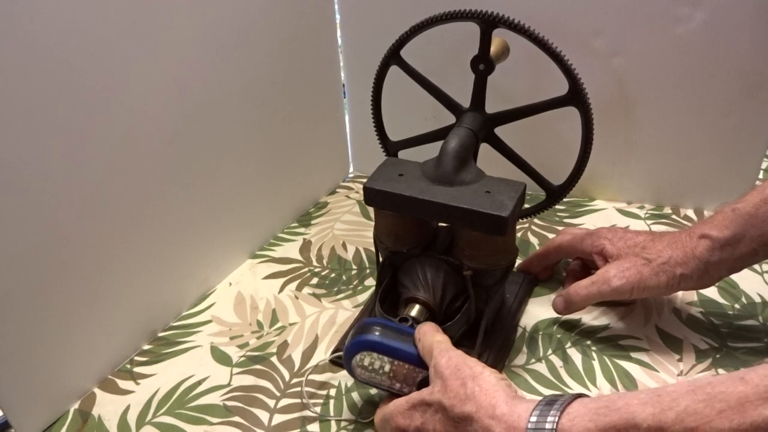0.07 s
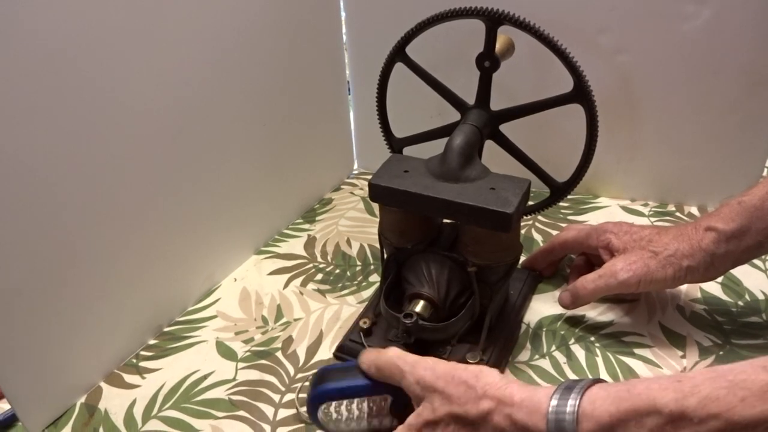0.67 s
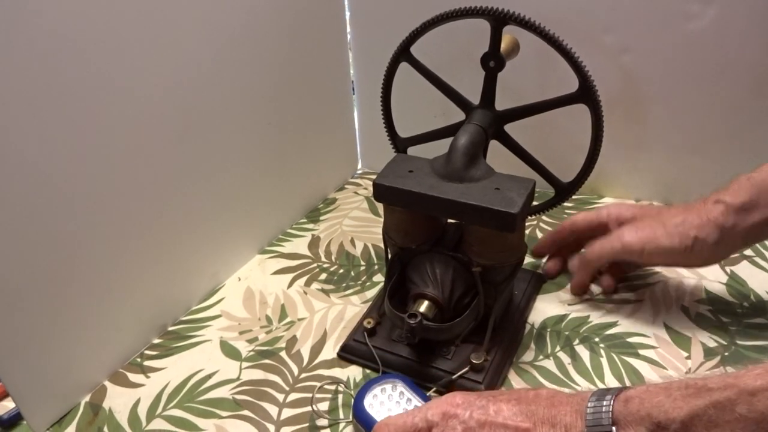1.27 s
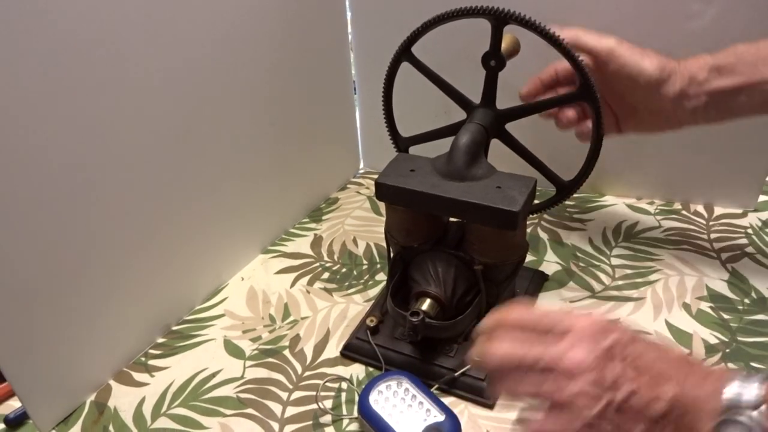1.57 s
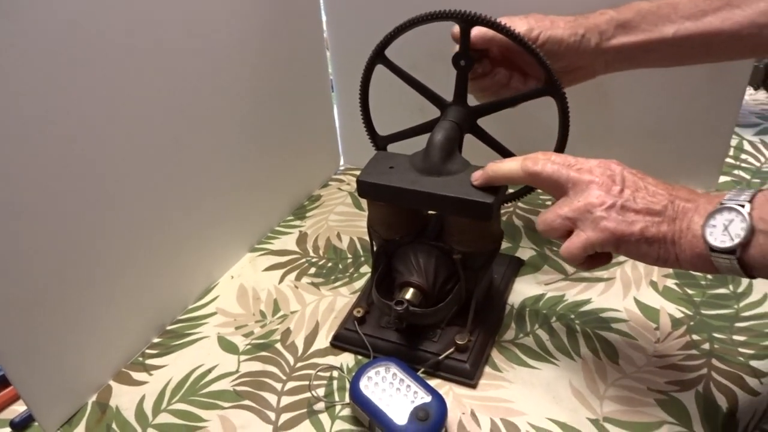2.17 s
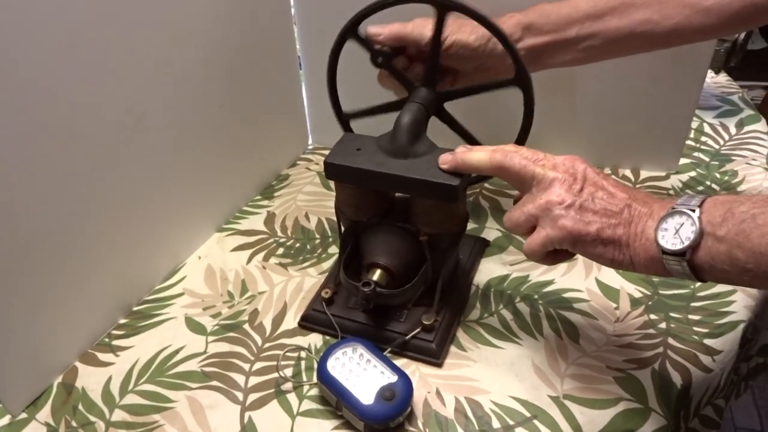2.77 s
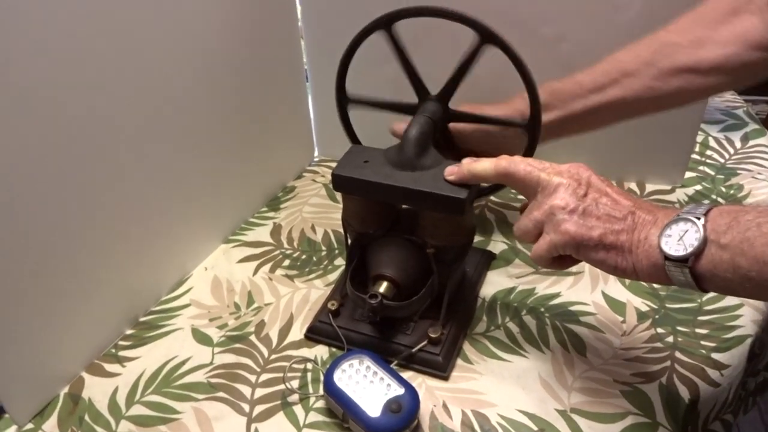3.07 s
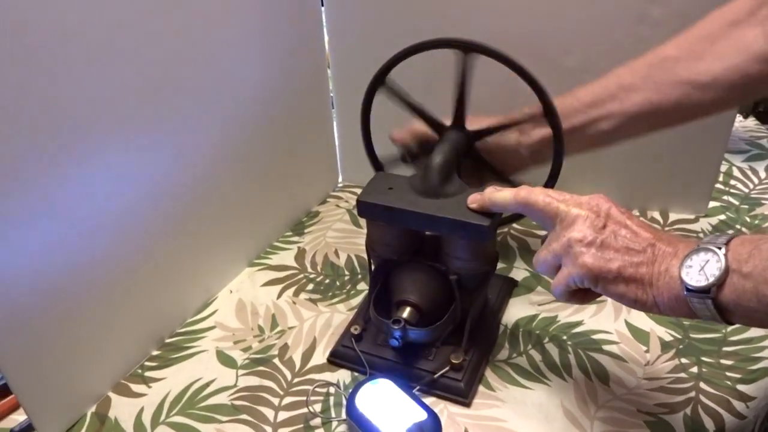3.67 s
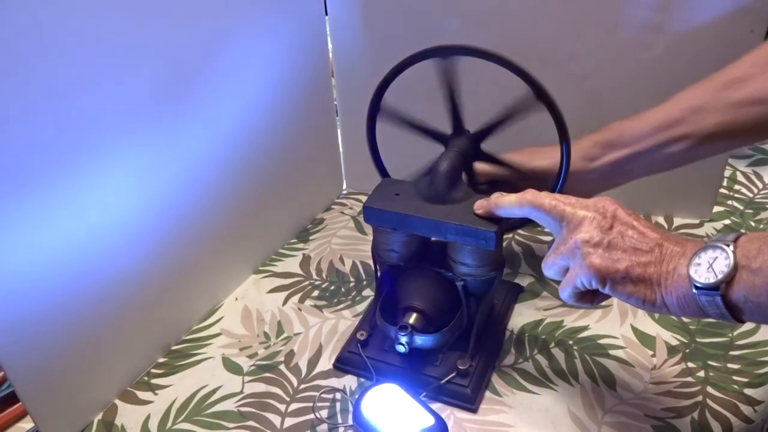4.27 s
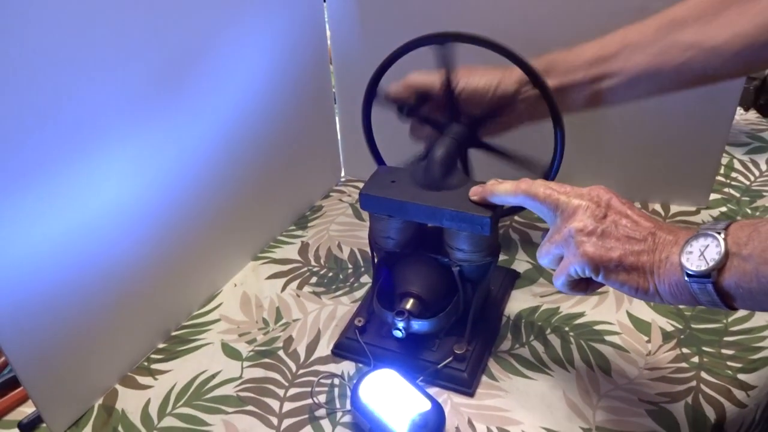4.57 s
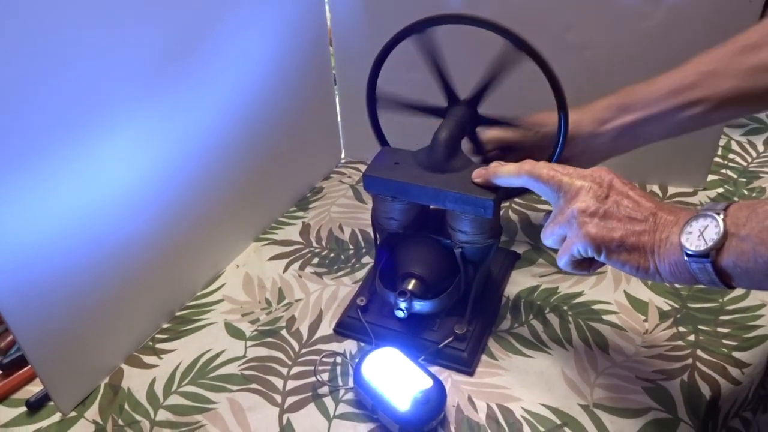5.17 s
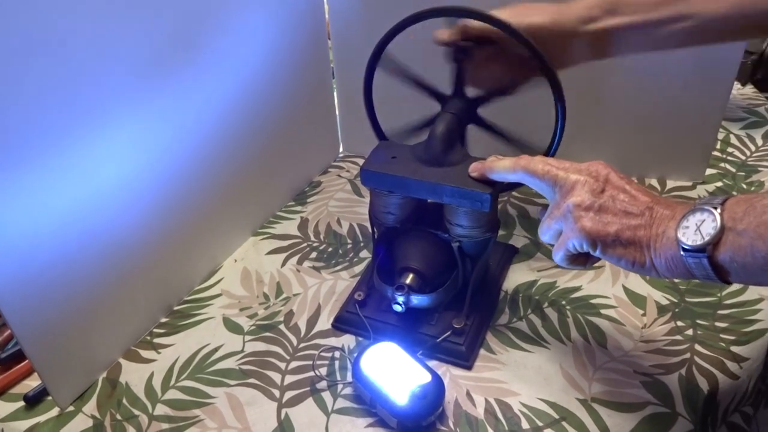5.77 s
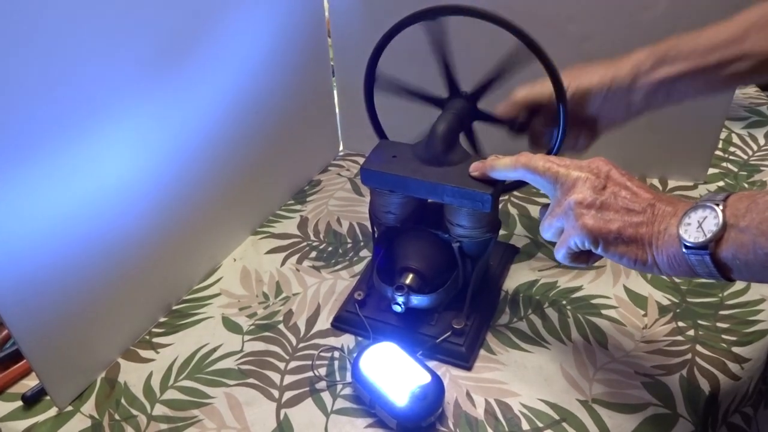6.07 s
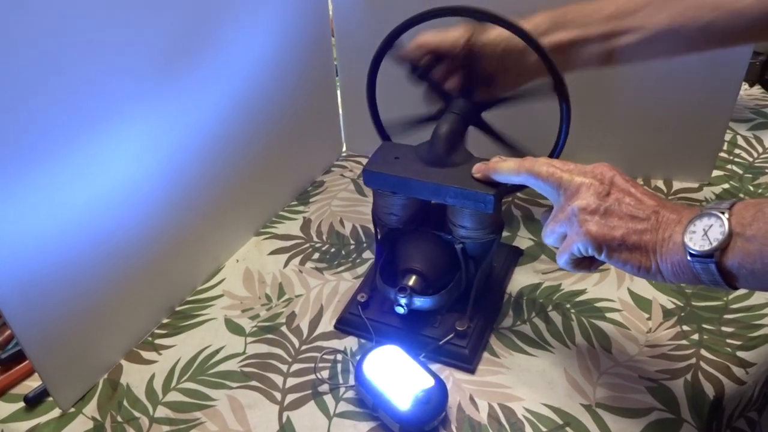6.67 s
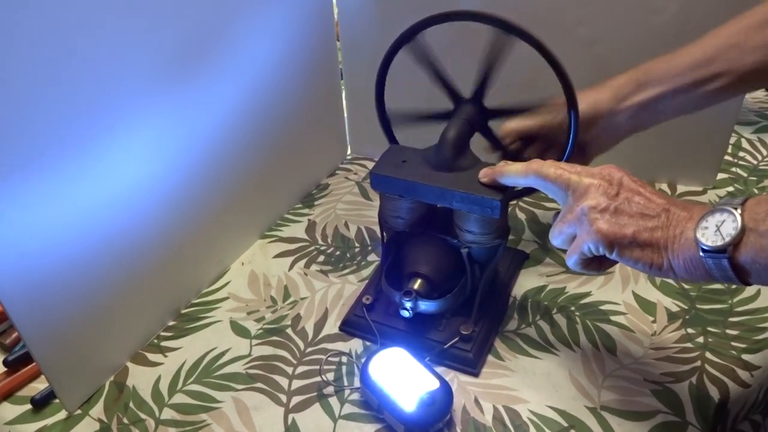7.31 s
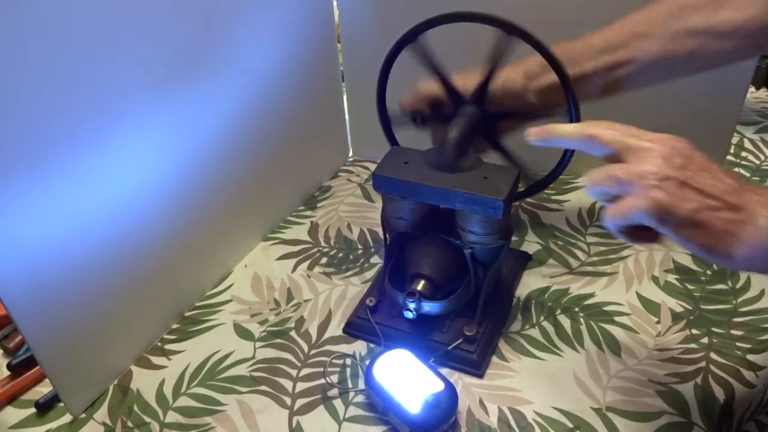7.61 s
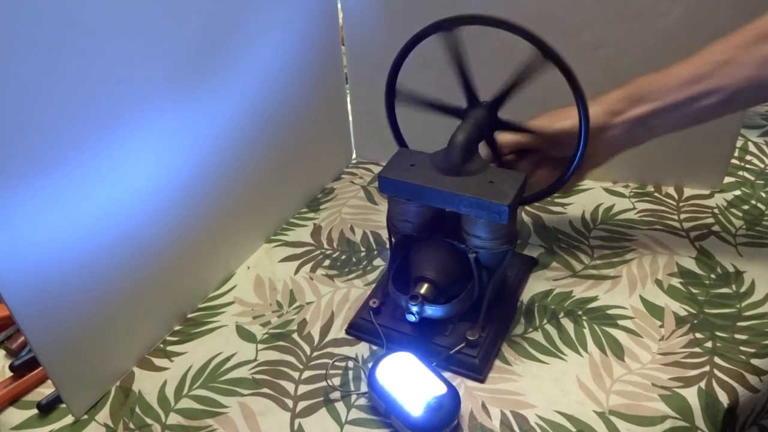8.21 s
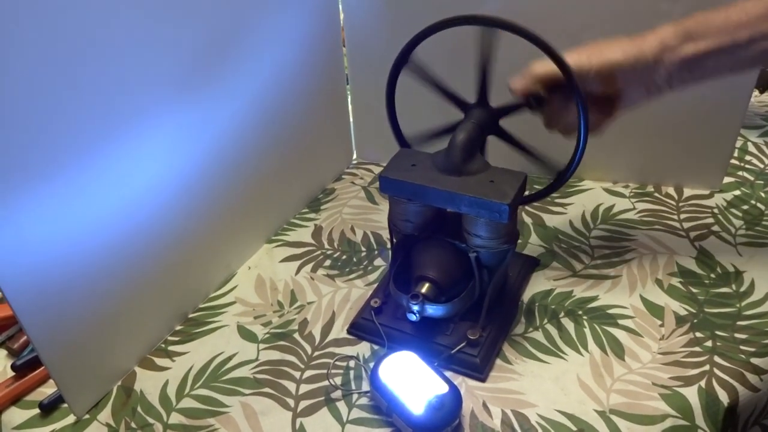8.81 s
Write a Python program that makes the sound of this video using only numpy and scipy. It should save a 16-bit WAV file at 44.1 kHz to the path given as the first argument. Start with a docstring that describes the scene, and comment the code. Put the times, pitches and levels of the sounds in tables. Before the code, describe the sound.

A lamp slides softly over a tablecloth and a hand lightly taps an iron frame. Then an old cast-iron hand generator is cranked: its gear teeth thud and clash, quickly rising in pitch to a loud, grinding whir with a bright metallic rattle. A low drone swells with each turn of the crank, about twice a second. It is heard close up in a small room with a faint fan hiss.

```python
"""Soft slides and light taps come first: a lamp is moved over a tablecloth, a hand taps an iron frame.
Then an old cast-iron hand generator is cranked up to speed, close by in a small room. The teeth of
its big wheel thud and grind, swelling with each push of the crank, and the base drones at the tooth
rate. The loose pinion clashes, rattles and sets the iron ringing. A distant fan hisses faintly."""
import sys
import numpy as np
from scipy import signal
from scipy.fft import rfft, irfft, next_fast_len
from scipy.io import wavfile
from scipy.ndimage import uniform_filter1d

SR = 44100
rng = np.random.default_rng(int(sys.argv[2]) if len(sys.argv) > 2 else 0)


def unload_wav(signal):
    """Save mono or channel-first audio to the path in sys.argv[1] as 16-bit WAV at rate SR, clipped to [-1, 1]."""
    wavfile.write(
        sys.argv[1],
        SR,
        np.round(np.clip(np.atleast_2d(signal).T, -1, 1) * 32767).astype(np.int16),
    )


N = 399105
T = np.arange(N) / SR


# wheel run-up and cruise, before surge: (time [s], tooth rate [Hz])
WHEEL_SPEED = [(2.3, 31.2), (2.6, 71.7), (3.1, 155), (3.3, 194), (3.6, 253), (4.2, 304), (5.1, 329),
               (6.4, 328), (7.2, 330), (8.1, 314), (9.05, 297)]
def tooth_rate(surge=.04):
    """Teeth meshing per second; the wheel surges with each push."""
    turning = T > WHEEL_SPEED[0][0]
    return curve(WHEEL_SPEED) * (1 + surge * stroke()) * turning


# one push per crank turn: (time [s], grind [dB], drone [dB], thud [dB], stroke depth [1 = usual])
CRANK_PUSHES = [(2.3, -3.5, -7, 0, 0.49), (3.05, -2.8, 2, -.5, .5), (3.72, 1.4, 1.5, .3, 1.1),
                (4.22, .6, 1.5, 0.5, .6), (4.68, -.3, -1.5, 0, .7), (5.09, -.3, 2, .5, 0.91),
                (5.53, .5, 1, -.5, 1.1), (5.96, -.4, 0, -.3, .8), (6.35, -.7, .5, -.3, .9),
                (6.81, -.5, -1, 1.5, 1), (7.23, -.3, -3, .5, 1.1), (7.67, -.6, -3.8, -1, 1.2),
                (8.12, -1.3, -2.8, 0, 1.3), (8.59, 0, -2.5, -0.5, 1.31), (9.07, -.3, -6, -0.5, 1)]
def stroke(lag_turns=0, per_turn=1):
    """Arm swing, peaking lag_turns after each push; per_turn=2 is push and pull."""
    push_s = [row[0] for row in CRANK_PUSHES]
    turns = np.interp(T, push_s, np.arange(len(push_s)))
    return curve(CRANK_PUSHES, column=4) * np.cos(2 * np.pi * per_turn * (turns - lag_turns))


# force on the crank: (time [s], level [dB])
CRANK_EFFORT = [(2.45, -37), (2.6, -16), (2.7, -9.5), (2.77, -12.5), (2.87, -4), (2.95, 0), (3.14, 0),
                (3.5, -7), (4.2, -7.5), (4.8, -9), (6.7, -10), (7.6, -12), (9.05, -11.5)]
def effort_db():
    """Crank load, greatest during run-up."""
    return curve(CRANK_EFFORT)


def mesh(rate_hz):
    """Running tooth count, and the samples at which a tooth engages."""
    teeth = np.cumsum(rate_hz * (1 + .025 * wander(45))) / SR
    return teeth, np.flatnonzero(np.diff(np.floor(teeth)))


def swell(level_db, swing_db, lag_turns, jitter_db):
    """Gain that rises and falls once a crank turn, never twice alike."""
    return gain_of(level_db + swing_db * stroke(lag_turns) + jitter_db * wander(26))


def comes_in(rate_hz, onset_hz):
    """Gain that climbs steeply with tooth rate and levels off above the onset."""
    drive = (rate_hz / onset_hz) ** 8
    return np.sqrt(drive / (1 + drive))


# frame and table-top modes: (frequency [Hz], level [dB], t60 [s])
FRAME_MODES = [(167.7, -2, 0.34), (199, -6, 0.13), (257.2, -3, 0.26), (284, -9.5, 0.059), (397, -10, 0.042),
               (489, -12, 0.13)]
TABLE_MODES = [(62, -21, 0.13), (88.4, -10.5, 0.26), (107, 0, 0.3), (132, -1, 0.28)]
def thudding(teeth, at, rate_hz):
    """Uneven teeth shake frame and table; a tone at the tooth rate rises through the thuds."""
    frame = steadied(struck(FRAME_MODES, at, split=.078, drift_db=3.5), .077)
    tone = np.sin(2 * np.pi * teeth) * gain_of(2 * wander(30))
    tone = coloured(tone, [(110, -22), (160, .5), (200, 3), (260, 4.5), (310, -33)])
    frame = coloured(gain_of(-.5) * frame + gain_of(-1.5) * tone, [(70, -2), (150, .97)])
    table = steadied(struck(TABLE_MODES, at, split=.079, drift_db=2.5), .093)
    table = coloured(table, [(20, 19), (40, -7), (80, .5)])
    load_db = effort_db() + curve(CRANK_PUSHES, column=3)
    pull_db = stroke(lag_turns=.54, per_turn=2)
    thud = swell(-18.9, swing_db=1.9, lag_turns=.02, jitter_db=1.6) * gain_of(load_db + pull_db)
    rumble = swell(-31.8, swing_db=2.5, lag_turns=.72, jitter_db=2) * gain_of(.5 * load_db)
    return thud * frame + rumble * comes_in(rate_hz, onset_hz=100) * table


def tooth_pressure(rate_hz):
    """How hard the teeth rub, as a gain; follows effort, speed and each push."""
    load = gain_of(.41 * effort_db() + curve(CRANK_PUSHES, column=1))
    push = swell(-21.4, swing_db=2.7, lag_turns=0, jitter_db=.5)
    return push * load * comes_in(rate_hz, onset_hz=127)


# sliding-tooth spectrum: (frequency [Hz], density [dB])
GRIND_SPECTRUM = [(50, -34), (200, -13), (450, 5), (780, 0.5), (900, -0.5), (1450, -1.5), (1750, -1.5),
                  (2300, -1), (3150, 0.5), (3500, -3.5), (5900, 1), (7100, -2.5), (10700, -5),
                  (11500, -8.5), (15200, -20)]
# spoke and bracket modes: (frequency [Hz], level [dB], t60 [s])
SPOKE_MODES = [(636, 2.5, 0.053), (774, -.5, 0.065), (839, -1.5, 0.068), (1097, 1, 0.029),
               (1649, -.5, .055), (1930, 2, 0.033), (2217, 2, .07), (2470, -3.5, 0.094),
               (3143, -1.5, 0.036), (3995, 0.5, .07), (4520, -1, .08)]
def grinding(teeth, at, rate_hz, pressure):
    """Each tooth scrapes and rings the spokes; hiss takes over from ringing with speed."""
    scrape = (1.8 + np.exp(-(teeth % 1) / .34)) * gain_of(2.8 * wander(350))
    noise = unit_rms(coloured(scrape * rng.standard_normal(N), GRIND_SPECTRUM))
    spokes = steadied(struck(SPOKE_MODES, at, split=.015, drift_db=6.5), .08)
    hiss_share = .4 + .37 * np.clip(rate_hz / 300, 0, 1)
    hiss = gain_of(4.5) * np.sqrt(hiss_share) * dulled_when_slow(noise)
    ringing = gain_of(1.5) * np.sqrt(1 - hiss_share) * spokes
    return pressure * gain_of(.35 * lull_db()) * dulled_when_slow(hiss + ringing)


# pinion-and-tooth modes, wheel-rim modes: (frequency [Hz], level [dB], t60 [s])
IRON_MODES = [(3676, -13, 0.031), (3950, -9.5, 0.085), (4530, -6.5, 0.07), (4795, -10.5, .08),
              (4970, -12, 0.06), (5780, -2, 0.065), (6450, -8, 0.035), (6570, -5, .045), (6880, -5, 0.069),
              (6960, -8, 0.037), (7470, -4, 0.078), (8380, -10, 0.046), (8400, -2.5, 0.03),
              (8700, -0.5, 0.071), (9280, -4, 0.07), (9860, -4.5, .07), (10380, -1.5, 0.045),
              (10700, -11.5, 0.056), (10730, -4.5, .07), (10980, -7.5, 0.052), (12440, -4.5, 0.05),
              (12670, -4, 0.045), (13050, -12, .04), (13300, -12, .05), (13800, -16, .05), (13650, -8, .04),
              (14400, -9, .03), (14800, -10, .035)]
RIM_MODES = [(5171, 0, .16), (5316, -3, .13)]
# tooth-on-tooth crack: (frequency [Hz], density [dB])
CRACK_SPECTRUM = [(500, -27), (2000, -2.5), (3500, -25), (4300, -9), (6100, -12), (6700, 3), (7700, 3),
                  (9100, -6), (10700, -7), (11500, -13), (12200, -15), (13000, -17), (15000, -1.5),
                  (15400, -17)]
def rattling(at, rate_hz, pressure):
    """The pinion bounces across its backlash about once a tooth; the rim sings along."""
    scatter = (rng.uniform(-.5, .5, len(at)) * np.gradient(at)).astype(int)
    bounces = np.clip(at + scatter, 0, N - 1)
    sizes = gain_of(2.3 * rng.standard_normal(len(at)))
    iron = steadied(struck(IRON_MODES, bounces, sizes, split=.005, drift_db=3.5), .056)
    rim = steadied(struck(RIM_MODES, bounces, sizes, split=.0024, drift_db=3), .058)
    crack = steadied(coloured(bursts(bounces, sizes, t60_s=.031), CRACK_SPECTRUM), .03)
    # pressed teeth: less ring, more crack
    crack_share = np.clip(.2 * (pressure / gain_of(-25.5)) ** .65, 0, .8)
    pinion = dulled_when_slow((1 - crack_share) * iron + gain_of(-1.5) * np.sqrt(crack_share) * crack)
    pinion *= swell(-16.9, swing_db=.6, lag_turns=.25, jitter_db=.6) * comes_in(rate_hz, onset_hz=201)
    rim *= swell(-29.4, swing_db=1.8, lag_turns=.48, jitter_db=3.2) * comes_in(rate_hz, onset_hz=205)
    rim *= gain_of(-.45 * effort_db())  # rings more freely under light load
    return gain_of(lull_db()) * (pinion + rim)


# rests in the rattle: (time [s], length [s])
RATTLE_LULLS = [(3.07, .03), (3.193, 0.025), (3.256, 0.066), (3.397, 0.017), (3.486, 0.023), (3.558, 0.032),
                (3.811, .022), (3.875, .018), (4.04, .038), (4.502, .032), (4.936, .03), (5.228, .019),
                (5.345, .018), (5.78, .03), (6.209, .014), (6.62, .034), (7.056, .02), (7.355, 0.034),
                (7.498, .045), (7.784, .044), (7.958, .031), (8.284, .013), (8.397, .027), (8.46, 0.017),
                (8.859, .014), (8.91, .02)]
def lull_db(fall_db_per_s=290):
    """Ringing dies while the teeth stay in contact, until the next bounce."""
    fade_db = np.zeros(N)
    for start_s, length_s in RATTLE_LULLS:
        since_s = T[:int(length_s * SR)]
        fade_db[int(start_s * SR):][:len(since_s)] = -fall_db_per_s * since_s
    return fade_db


def droning(teeth, at, rate_hz, base_hz=338):
    """The base booms with every tooth and sings out as the tooth rate nears its resonance."""
    boom = steadied(struck([(base_hz, 0, .12)], at, split=.049, drift_db=0), .084)
    tone = np.sin(2 * np.pi * teeth) + gain_of(-23) * np.sin(4 * np.pi * teeth)
    tone *= gain_of(1.1 * wander(60))
    nearness = np.clip((rate_hz - 270) / 50, 0, 1)
    drone = steadied(boom + gain_of(4.5) * nearness * tone, .095)
    load_db = curve(CRANK_PUSHES, column=2) + stroke(lag_turns=.54, per_turn=2)
    push = swell(-27.1, swing_db=6.8, lag_turns=.01, jitter_db=1.3) * gain_of(load_db)
    return push * comes_in(rate_hz, onset_hz=94) * drone


# single tooth clashes: (time [s], relative level [dB])
TOOTH_CLASHES = [(2.6833, -29), (2.702, -29), (2.778, -21), (2.811, -22), (2.834, -24), (2.8534, -16.5),
                 (2.9244, -12), (2.9534, -11), (2.9795, -16), (3.033, -7), (3.1022, -9), (3.128, -10),
                 (3.1742, -9), (3.2191, -7), (3.231, -9), (3.321, -8), (3.3448, -7), (3.4251, -14),
                 (3.4444, -9), (3.5074, -17), (3.5464, -10), (3.588, -18), (3.7979, -8.5), (3.8342, -14),
                 (7.544, -13), (7.8292, -9), (8.303, -11)]
def clashing():
    """Hard blows where the slack is taken up."""
    time_s, level_db = np.transpose(TOOTH_CLASHES)
    at, sizes = (time_s * SR).astype(int), gain_of(level_db)
    ringing = struck(IRON_MODES + RIM_MODES, at, sizes, split=.0049, drift_db=-1)
    crack = coloured(bursts(at, sizes, t60_s=.076), CRACK_SPECTRUM)
    return dulled_when_slow(gain_of(-27) * ringing + gain_of(-3.5) * crack)


def dulled_when_slow(x):
    """Slow teeth strike and scrape dully, fast ones brightly."""
    dull = coloured(x, [(500, .5), (800, 2), (1300, 1), (2000, 0), (3000, -3), (5000, -2.5),
                        (8000, -4), (10500, -8), (13000, -11)])
    pace = np.clip(curve(WHEEL_SPEED) / 310, 0, 1) ** 3
    return dull + pace * (x - dull)


# base thumps: (time [s], level [dB], pitch [Hz], t60 [s])
BASE_BUMPS = [(2.701, -15.5, 198, 0.1), (2.954, -10, 170, 0.065)]
def bumping():
    """The base rocks and thumps on the cloth."""
    thumps = sum(ring(impulses([int(time_s * SR)], [gain_of(db)]), hz, t60_s)
                 for time_s, db, hz, t60_s in BASE_BUMPS)
    return coloured(thumps, [(400, -.5), (3000, -18)])


# cloth friction: (frequency [Hz], density [dB])
CLOTH_SPECTRUM = [(500, -13), (2000, -5), (4500, 1), (7000, 1.5), (10000, -3.5), (14500, -3), (16000, -12)]
# slides: (centre time [s], half length [s], level [dB], brightness [Hz]); the last is the wheel rubbing as it
# starts to turn
CLOTH_SLIDES = [(.12, .09, -60, 7000), (.495, .018, -50, 15000), (0.664, .052, -45, 15000),
                (1.335, 0.03, -53, 14000), (2.4, .085, -49.5, 2600)]
def sliding():
    """Lamp and hand hiss over the tablecloth; a soft rub rises as the wheel starts to turn."""
    rub = unit_rms(coloured(rng.standard_normal(N) * gain_of(2 * wander(200)), CLOTH_SPECTRUM))
    out = np.zeros(N)
    for centre_s, half_s, db, bright_hz in CLOTH_SLIDES:
        hiss = unit_rms(coloured(rub, [(bright_hz, 0), (bright_hz * 3, -17)]))
        out += gain_of(db) * np.exp(-((T - centre_s) / half_s) ** 2) * hiss
    return out


# taps: (time [s], relative level [dB], brightness [Hz])
LIGHT_TAPS = [(.31, -29, 600), (.883, -36, 1500), (1.036, -38, 7000), (1.965, -47, 4000),
              (2.081, -25, 2900), (2.415, -49, 8000), (2.566, -39, 8000)]
# modes rung by a tap: (frequency [Hz], level [dB], t60 [s])
TAP_MODES = [(847, 1.5, 0.13), (1168, 5, .05), (1620, -5, .1), (2304, -7, .07), (3250, -18, .04),
             (3950, 2, .04), (4250, 3, .035), (4807, 0, 0.065), (5190, -5, 0.066), (7200, -4, .05),
             (10240, -10, .08)]
def tapping():
    """Hand and lamp tap lightly: a click and a short ring."""
    t = T[:SR // 4]
    ringing = sum(gain_of(db - 60 * t / t60_s) * np.sin(2 * np.pi * hz * t)
                  for hz, db, t60_s in TAP_MODES)
    fade = 1 - t / t[-1]
    out = np.zeros(N)
    for time_s, db, bright_hz in LIGHT_TAPS:
        click = gain_of(-5 - 60 * t / .045) * rng.standard_normal(len(t))
        band = [(bright_hz / 6, -7), (bright_hz, 0), (bright_hz * 3, -13), (bright_hz * 9, -32)]
        tap = coloured(gain_of(-13) * ringing + click, band)
        out[int(time_s * SR):][:len(t)] += gain_of(db) * tap * fade
    return out


def walls(x, t60_s=.18):
    """Sparse reflections from the corner and the room behind."""
    t = T[:SR // 3]
    echoes = rng.standard_normal(len(t)) * (rng.random(len(t)) < .05)
    echoes *= (t > .003) * gain_of(-60 * t / t60_s)
    return signal.oaconvolve(x, echoes / np.linalg.norm(echoes))[:N]


# quiet room: (frequency [Hz], density [dB])
AIR_SPECTRUM = [(20, -20), (38, -20), (55, 5.5), (72, -1.5), (125, -4), (190, 2), (270, -7), (385, -3),
                (425, -9), (475, -3.5), (560, -10.5), (1600, -15), (2300, -24.5), (4500, -28.5),
                (8000, -35.5), (16000, -38)]
def room_air():
    """Low room noise with the narrow hiss of a distant fan."""
    air = unit_rms(coloured(rng.standard_normal(N), AIR_SPECTRUM))
    fan_band = [(500, -54), (1000, -19), (1130, .5), (1250, 2), (1400, -24), (2800, -46)]
    fan = unit_rms(coloured(rng.standard_normal(N), fan_band))
    return gain_of(-44.5) * (gain_of(-1) * air + gain_of(-7) * fan)


# balance between microphone ports: (frequency [Hz], left minus right [dB])
PORT_BALANCE = [(60, -1.2), (170, -2.2), (330, -1.5), (700, -.5), (1200, 0), (5000, .3), (9000, -.3),
                (12000, 0)]
def ports(x):
    """Two close ports hear the machine at slightly different levels."""
    return np.array([coloured(x, [(hz, sign * db / 2) for hz, db in PORT_BALANCE]) for sign in (1, -1)])


def struck(modes, at, sizes=1, *, split, drift_db):
    """Blows feed close mode pairs at random; the contact point drifts and favours some modes."""
    out = np.zeros(N)
    for hz, db, t60_s in modes:
        favour = np.interp(T[at] * 22, np.arange(400), rng.standard_normal(400))
        force = sizes * gain_of(db + drift_db * favour) / np.sqrt(t60_s)
        offset_hz = split * hz * np.sqrt(hz / 5000) / 2
        for pitch_hz in (hz - offset_hz, hz + offset_hz):
            out += ring(impulses(at, force * rng.standard_normal(len(at))), pitch_hz, t60_s)
    return out


def ring(x, hz, t60_s):
    """One mode struck by x; radiates little far below its pitch."""
    radius = np.exp(-np.log(1000) / (t60_s * SR))
    angle = 2 * np.pi * hz / SR
    return signal.lfilter([.5, 0, -.5], [1, -2 * radius * np.cos(angle), radius ** 2], x + 1e-18)


def bursts(at, sizes, t60_s):
    """Each blow starts a dying puff of noise."""
    decay = np.exp(-2 * np.log(1000) / (t60_s * SR))
    power = signal.lfilter([1], [1, -decay], impulses(at, sizes) ** 2 + 1e-24)
    return np.sqrt(power) * rng.standard_normal(N)


def impulses(at, sizes):
    """Impulses at the given samples."""
    return np.bincount(at, sizes, N)[:N]


def coloured(x, points):
    """Filter through (frequency [Hz], gain [dB]) points."""
    hz, db = np.transpose(points)
    size = next_fast_len(len(x), real=True)
    bin_db = np.interp(np.log(np.fft.rfftfreq(size, 1 / SR) + 1), np.log(hz), db)
    return irfft(rfft(x, size) * gain_of(bin_db), size)[:len(x)]


def curve(rows, column=1):
    """One column of a timed table at every sample."""
    rows = np.array(rows)
    return np.interp(T, rows[:, 0], rows[:, column])


def wander(per_s):
    """Smooth random drift, rms 1."""
    return unit_rms(np.interp(T * per_s, np.arange(20000), rng.standard_normal(20000)))


def steadied(x, window_s):
    """Scale to a running rms of 1."""
    power = abs(uniform_filter1d(x ** 2, int(window_s * SR)))
    return x / np.sqrt(power + 1e-3 * np.mean(x ** 2))


def unit_rms(x):
    """Scale to rms 1."""
    return x / np.sqrt(np.mean(x ** 2) + 1e-20)


def gain_of(db):
    """Decibels to amplitude."""
    return np.exp(np.asarray(db) * (np.log(10) / 20))


def scene():
    """Machine in the middle; reflections and room noise add a little width."""
    rate_hz = tooth_rate()
    teeth, at = mesh(rate_hz)
    pressure = tooth_pressure(rate_hz)
    low = thudding(teeth, at, rate_hz) + droning(teeth, at, rate_hz) + bumping()
    high = grinding(teeth, at, rate_hz, pressure) + rattling(at, rate_hz, pressure) + clashing()
    high += sliding() + tapping()
    mid = low + high + gain_of(-14.5) * walls(high)
    side = coloured(walls(high + low), [(100, -34), (300, -26), (700, -16.5), (1700, -17.5),
                                        (2800, -23), (5000, -20), (9000, -15.5), (11500, -30)])
    side += coloured(room_air(), [(40, -29), (200, -15), (600, -4.5), (1300, -2.5), (5000, -4),
                                  (12000, -12)])
    return ports(mid) + room_air() + np.array([side, -side])


def record(dry, cutoff_hz=15800):
    """Soft clip, then low-pass."""
    lowpass = signal.firwin(511, cutoff_hz, window=("kaiser", 9), fs=SR)
    return signal.oaconvolve(np.tanh(dry), lowpass[None], "same")


dry = scene()
out = record(dry)
unload_wav(out)
```